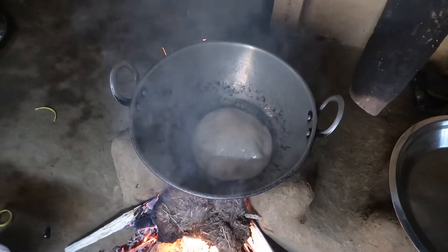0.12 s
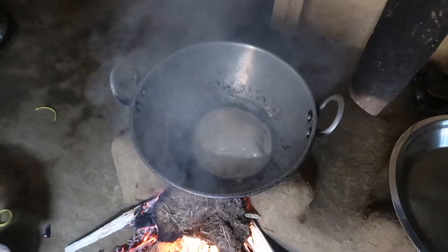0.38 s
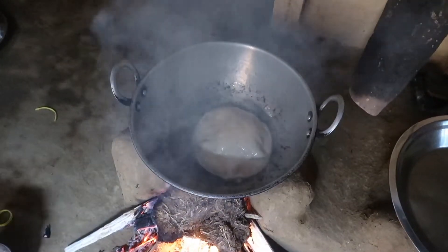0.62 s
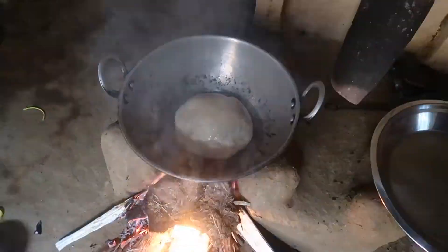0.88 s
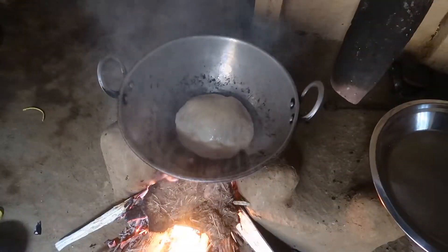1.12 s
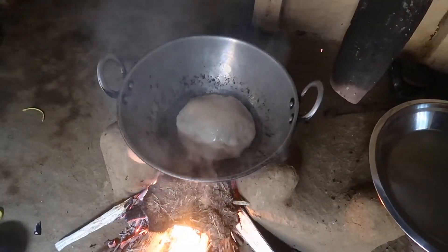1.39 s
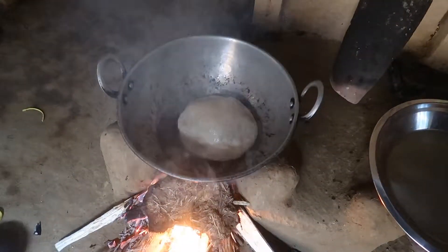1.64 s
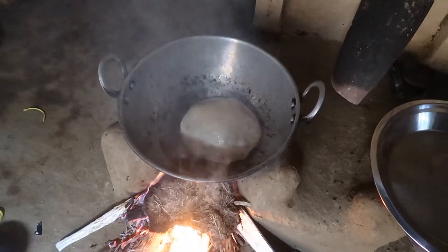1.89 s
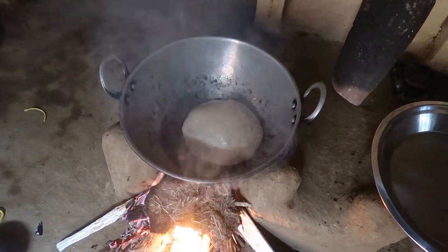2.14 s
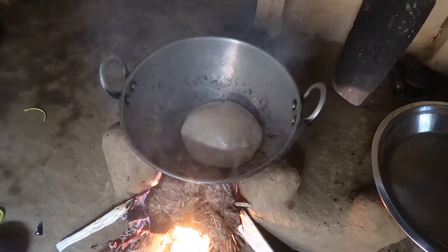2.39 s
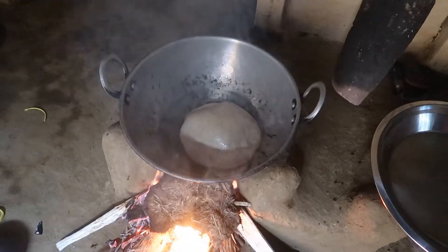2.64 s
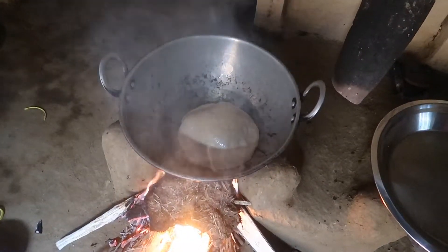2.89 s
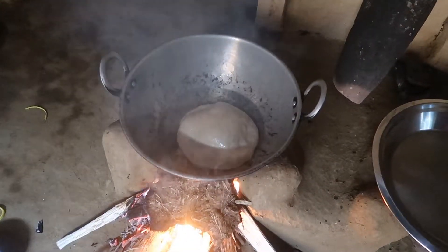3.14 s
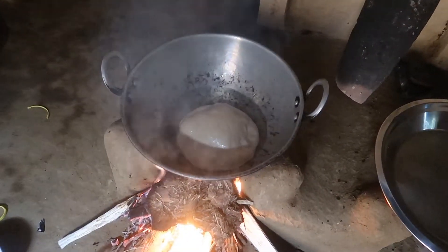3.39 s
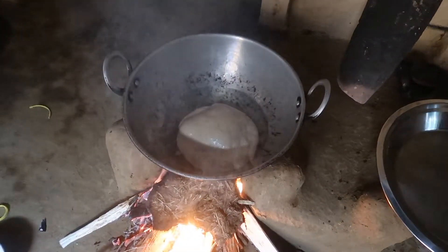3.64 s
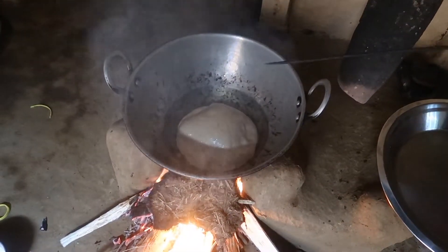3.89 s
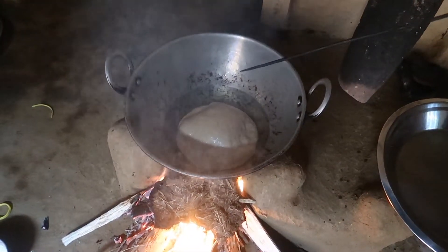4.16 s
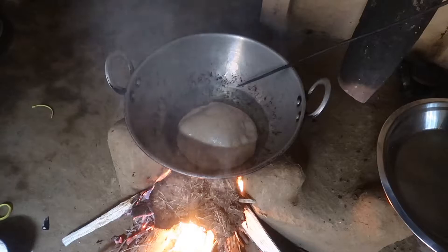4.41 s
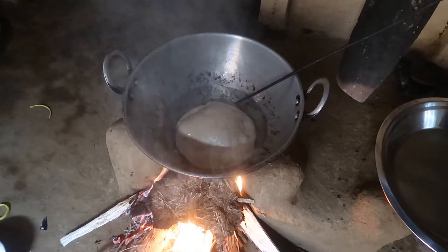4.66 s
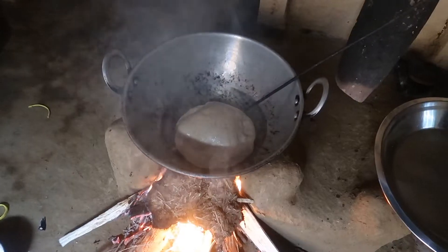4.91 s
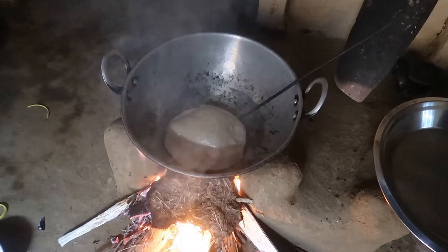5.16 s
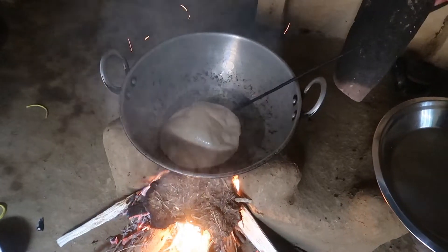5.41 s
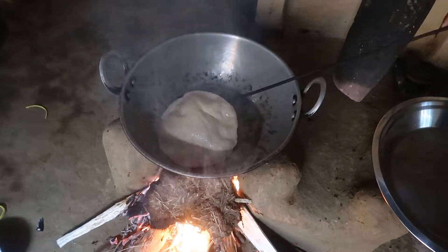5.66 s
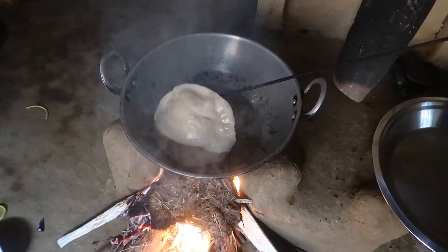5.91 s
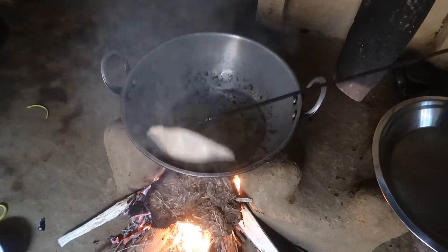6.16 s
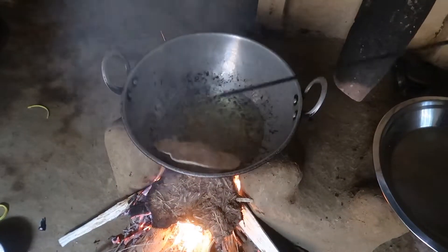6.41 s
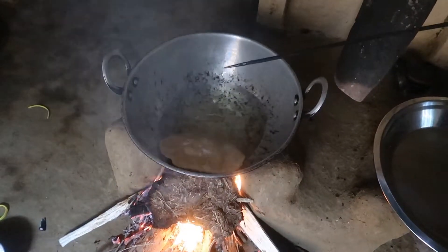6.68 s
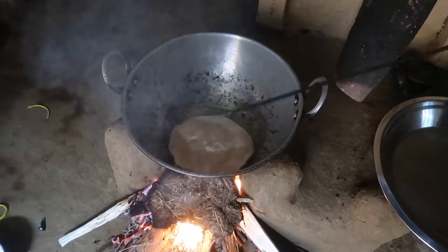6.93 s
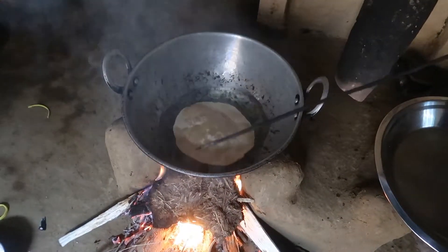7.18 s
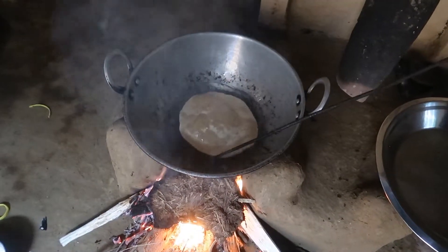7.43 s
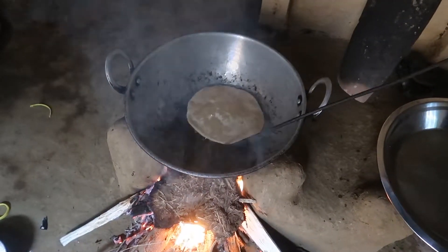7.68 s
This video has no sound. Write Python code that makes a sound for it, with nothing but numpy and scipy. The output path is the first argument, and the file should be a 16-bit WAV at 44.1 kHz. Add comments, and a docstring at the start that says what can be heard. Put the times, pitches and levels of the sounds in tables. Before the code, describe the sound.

Gentle oil hiss and fire pops in a small kitchen, a metal tool clanks and scrapes, a burning stick cracks loudly, bubbling builds.

```python
"""Dough fries in a wok of oil over a wood fire in a small, half-open kitchen; the fire rumbles low throughout.
At first noise hiss and ringing bubbles weaken while filtered noise bursts pop; dull modal knocks come
from nearby. After 4 s a metal tool of dying sines clanks, bounces and drags. A stick then splits with
the loudest crack, gain control ducks the level, and the frying returns, livelier, with more pops and
knocks. The walls add a short noise tail."""
import sys
import numpy as np
from scipy import signal
from scipy.fft import rfft, irfft
from scipy.io import wavfile
from scipy.ndimage import uniform_filter1d

SR = 44100
rng = np.random.default_rng(int(sys.argv[2]) if len(sys.argv) > 2 else 0)


def int16_out(signal):
    """Quantize to a 16-bit WAV file."""
    q = np.round(np.clip(np.atleast_2d(signal).T, -1, 1) * 32767)
    wavfile.write(sys.argv[1], SR, q.astype(np.int16))


def invert_db(x):
    """Field ratio 10**(x/20) for x, a level in decibels (scalar or array-like)."""
    u = np.asarray(x, float) / 20
    return 10 ** u


N = 343980


def evened(x):
    """Scales to rms 1."""
    return x / np.sqrt(np.mean(x ** 2) + 1e-20)


def read(points, hz):
    """Interpolates a spectrum on a log-frequency axis."""
    f, value = np.transpose(points)
    return np.interp(np.log(hz + 1), np.log(f + 1), value)


def curve(rows, column):
    """Interpolates one dB column over time, as gain per sample."""
    rows = np.array(rows)
    return invert_db(np.interp(np.arange(N) / SR, rows[:, 0], rows[:, column]))


def band(x, low_hz, high_hz):
    """Butterworth band-pass."""
    edges_hz = [low_hz, min(high_hz, SR / 2.2)]
    return signal.sosfilt(signal.butter(2, edges_hz, "band", fs=SR, output="sos"), x)


def resonate(x, hz, width_hz):
    """A fixed resonance of peak gain 1."""
    b, a = signal.iirpeak(hz, hz / width_hz, SR)
    return signal.lfilter(b, a, x)


def ring(modes, hard_hz):
    """Dying sines; a soft contact weakens the high ones."""
    t = np.arange(SR // 3) / SR
    hz, db, t60_s = np.transpose(modes)[:, :, None]
    level = invert_db(db - 60 * t / t60_s) / (1 + (hz / hard_hz) ** 2)
    return (level * np.sin(2 * np.pi * hz * t)).sum(0)


def burst(ms):
    """A sharp step and a puff of noise with time constant ms, whitened, then faded at half that rate."""
    fading = np.exp(-np.arange(SR // 10) / (ms * SR / 1000))
    puff = 0.3 * rng.standard_normal(SR // 10) * fading
    puff[0] = 1
    z = rfft(puff)
    return irfft(z / abs(z)) * np.sqrt(fading)


# left-right likeness of broad noise: f/Hz, correlation
LIKENESS = [(60, 0.99), (180, 0.33), (550, -0.019), (1650, 0.68), (4970, 0.71), (15000, -0.26)]


def air(spectrum, patchy_db, size):
    """Stereo noise of rms 1 from random short-time spectra with drifting patches; size in samples."""
    hz = np.fft.rfftfreq(size, 1 / SR)
    a, b, c, d, patches = rng.standard_normal((4 * N // size + 5, len(hz), 5)).T
    patches = uniform_filter1d(patches, size=4, axis=0)
    patches = evened(uniform_filter1d(patches, size=10, axis=1))
    same = np.clip(read(LIKENESS, hz), -1, 1)[:, None]
    left = a + 1j * b
    right = same * left + np.sqrt(1 - same ** 2) * (c + 1j * d)
    z = np.array([left, right]) * invert_db(read(spectrum, hz)[:, None] + patchy_db * patches)
    noise = signal.istft(z, nperseg=size, noverlap=3 * size // 4)[1]
    return evened(noise[:, :N])


# decay of the kitchen's tail: f/Hz, t60/s
WALL_DECAY = [(200, 0.35), (530, 0.13), (1390, 0.19), (3680, 0.19), (9700, 0.06)]


def walls(x, wet_db, apart, boom_db):
    """Direct sound, a fresh noise tail for each call, and the kitchen's lowest standing wave."""
    boom_hz, boom_t60_s = 154, 0.3
    length = SR // 3
    hz, t, (both, either) = signal.stft(rng.standard_normal((2, length)), SR, nperseg=128)
    either *= apart * (0.073 + hz[:, None] / 6000)  # sides differ most in the treble
    fading = invert_db(-60 * t / read(WALL_DECAY, hz)[:, None])
    z = np.array([both + either, both - either]) * fading
    tail = signal.istft(z, SR, nperseg=128)[1][:, :length]
    tail *= 1 - np.exp(-np.arange(length) / (0.0011 * SR))  # first echoes take a few ms
    tail *= invert_db(wet_db) / np.linalg.norm(tail.mean(0))
    tail += ring([(boom_hz, boom_db, boom_t60_s)], SR)
    tail[:, 0] = 1  # direct sound
    return signal.fftconvolve(x[None], tail, axes=1)


def add(mix, s, db, sound):
    """Lays a sound into the mix at time s, scaled to its peak level."""
    part = mix[:, round(s * SR):][:, :sound.shape[1]]
    part += invert_db(db) * sound[:, :part.shape[1]] / abs(sound).max()


# frying vigour: t/s, bubbling level/dB, steam level/dB
FRYING_LEVELS = [(0.0, -51.5, -50.5), (0.76, -52.5, -50.5), (0.86, -53.5, -54.5), (1.5, -56.5, -56),
                 (2.6, -55.5, -55.5), (3.3, -58.5, -54.5), (4.3, -70, -54.5), (5.08, -54.5, -57.5),
                 (5.2, -57, -62), (5.6, -58.5, -64), (6.2, -56.5, -58.5), (6.45, -49.5, -55),
                 (6.7, -48.5, -57.5), (7.1, -46, -58), (7.45, -45.5, -51), (7.8, -44.5, -57.5)]
# coarse sizzle spectrum: f/Hz, relative level/dB
SIZZLE_SPECTRUM = [(500, -36), (900, -6), (1300, -4), (1800, -4), (2190, -3.5), (2260, 1.5), (2340, -3),
                   (3000, -2.5), (3800, -5.5), (5000, -10), (7000, -14.5), (11000, -27)]
# escaping steam spectrum: f/Hz, relative level/dB
STEAM_SPECTRUM = [(1500, -28), (4000, -7), (6000, -6.5), (8000, -9), (11000, -9), (13000, -17),
                  (14800, -14), (15400, -27), (16000, -63)]


def hiss():
    """Coarse sizzle roughened by tiny spits of uneven size, under a fine smooth steam hiss."""
    simmer_db, sizzle_over_bubbling_db = -53.5, 1.5  # the hot oil never falls silent
    spits_per_s, spit_decay_s = 150, 0.004
    spits = invert_db(1.6 * np.minimum(rng.exponential(1, N), 4)) * (rng.random(N) < spits_per_s / SR)
    spits = signal.lfilter([1], [1, -np.exp(-1 / (spit_decay_s * SR))], spits)
    sizzle = evened(air(SIZZLE_SPECTRUM, patchy_db=2.0, size=512) * (1 + 0.15 * spits))
    vigour = invert_db(sizzle_over_bubbling_db) * curve(FRYING_LEVELS, column=1)
    sizzle_level = np.hypot(invert_db(simmer_db), vigour)
    steam = curve(FRYING_LEVELS, column=2) * air(STEAM_SPECTRUM, patchy_db=2.5, size=512)
    return sizzle_level * sizzle + steam


# resonances of wok and oil: f/Hz, width per filter pass/Hz, relative level/dB
POOL_RESONANCES = [(340, 120, -6), (430, 80, -6), (635, 100, 0), (780, 120, -9), (960, 120, -9),
                   (650, 800, 0)]


def bubbling():
    """Bubbles burst at random and ring the pool of oil, each in one of its resonances."""
    pool = np.zeros(N)
    spread_db, bursts_per_s = 4.2, 50  # for each resonance
    for hz, width_hz, db in POOL_RESONANCES:
        size = invert_db(spread_db * np.minimum(rng.exponential(1, N), 3))
        bursts = size * (rng.random(N) < bursts_per_s / SR)
        rung = resonate(resonate(bursts, hz, width_hz), hz, width_hz)
        pool += invert_db(db) * evened(rung)
    echoed = walls(pool, wet_db=-6.0, apart=0.3, boom_db=-64)[:, :N]
    return curve(FRYING_LEVELS, column=1) * evened(echoed)


# wood and oil pops: t/s, peak level/dB, low edge f/Hz, high edge f/Hz, raw puff time constant/ms
POP_EVENTS = [(.115, -35.5, 494, 800, 2.2), (0.564, -35, 450, 1100, 3.6), (1.022, -28, 1240, 5040, 6.7),
              (1.1205, -42, 500, 1500, .6), (2.289, -37, 2000, 5000, 5.2), (2.3745, -21, 970, 2350, 0.68),
              (2.761, -26.5, 600, 9000, 1.2), (3.11, -35, 2440, 7900, 4.2), (3.229, -38, 9000, 13800, 2.2),
              (3.403, -30, 2060, 9700, 45), (3.976, -29, 775, 2490, 2), (4.005, -12.5, 990, 4130, 0.34),
              (4.998, -32.5, 590, 5000, 4.3), (5.499, -33.5, 497, 970, 18), (6.036, -33, 3600, 9050, 4),
              (6.045, -33.5, 3000, 3460, 1.5), (6.0455, -28.5, 1860, 2360, 0.56),
              (6.241, -26.5, 350, 1190, 0.85), (6.555, -18.5, 1600, 3160, 0.67),
              (6.963, -29, 890, 4030, 0.69), (7.276, -32, 550, 1000, 2.3), (7.49, -31, 495, 870, 0.55)]


def pops():
    """Gas pockets burst: a short puff with its own colour over a wide crack."""
    mix = np.zeros((2, N))
    for s, db, low_hz, high_hz, ms in POP_EVENTS:
        crack_db = -9 - 0.5 * np.log2(ms)  # longer bursts crack less
        puff = burst(ms)
        coloured = band(band(puff, low_hz, high_hz), 0.5 * low_hz, 1.07 * high_hz)
        crack = band(band(puff, 200, 4700), 100, 8500)
        pop = evened(coloured) + invert_db(crack_db) * evened(crack)
        add(mix, s, db, walls(pop, wet_db=2.0, apart=0.89, boom_db=-50))
    return mix


# modes of the burning stick: f/Hz, relative level/dB, t60/s
STICK_MODES = [(190, -13, 0.065), (350, -20, 0.23), (450, -0.5, 0.039), (1100, 2.5, 0.026),
               (1500, 2, 0.018), (2020, -3, 0.027), (2750, -6.5, 0.032), (1305, -2, 0.017)]


def bang():
    """A burning stick splits in one hard click: it rings a few cycles and a rough crash fills the kitchen."""
    start_s, peak_db = 5.1168, 9
    mix, click = np.zeros((2, N)), burst(1.0)
    crash = band(click, 204, 2150)
    crash += invert_db(-15) * band(click, 1150, 4500)
    crash += invert_db(-46) * band(click, 200, 9000)
    split = evened(walls(crash, wet_db=4.5, apart=0.82, boom_db=-64))
    split[:, :SR // 3] += invert_db(6.0) * evened(ring(STICK_MODES, SR))
    add(mix, start_s, peak_db, split)
    return mix


# metal tool, a blow and its bounces: t/s, peak level/dB, hardness f/Hz
CLANK_EVENTS = [(4.4076, -4, 4740), (4.504, -18, 3400), (4.537, -23.5, 3160), (4.574, -19.5, 3970)]
# tool modes: f/Hz, relative level/dB, t60 when struck/s
TOOL_MODES = [(336, -1.5, 0.065), (450, 1, 0.14), (494, -3.5, 0.11), (1165, -5, 0.28), (1395, -7, 0.053),
              (1660, 4, 0.15), (1720, -15, .06), (2000, -1, 0.027), (2125, 7.5, 0.03), (2710, 1, 0.048),
              (3730, 1, 0.064), (3000, -10, .06), (3330, -2, .06), (4200, 3, .07), (5500, 8, 0.031),
              (4666, 15.5, 0.017), (5000, 2, .05), (6010, 4, 0.12)]
# the tool slides: t/s, length/s, grit level before output gains/dB
DRAG_STROKES = [(4.499, 0.14, -49.5), (4.736, 0.27, -52.5)]


def drag_pressure(t, s, hold_s):
    """Pressure starts at about half, builds through the stroke's first part, then lets go."""
    rise = (t > s) * (0.49 + (t - s) / (0.8 * hold_s))
    release_s = 0.06
    release = 1 + (s + hold_s - t) / release_s
    return np.clip(np.minimum(rise, release), 0, 1)


def tool():
    """Blows and a dragged, gritty contact ring the same metal; blows clatter, the drag rubs."""
    mix = np.zeros((2, N))
    for s, db, hard_hz in CLANK_EVENTS:
        puff = burst(3.1)
        clatter = band(band(puff, 204, 0.79 * hard_hz), 200, 5700)
        clatter = evened(walls(clatter, wet_db=10.0, apart=0.69, boom_db=-39))
        clang = band(signal.fftconvolve(puff, ring(TOOL_MODES, hard_hz)), 206, 4700)
        add(mix, s, db, clatter + invert_db(1.0) * evened(clang))
    t = np.arange(N) / SR
    grains_per_s, damping_s = 1500, 0.06
    grit = rng.standard_normal(N) * (rng.random(N) < grains_per_s / SR)
    grit *= sum(invert_db(db) * drag_pressure(t, s, hold_s) for s, hold_s, db in DRAG_STROKES)
    rub = band(grit, 414, 770) + invert_db(-20) * band(grit, 3600, 5100)
    rub = walls(rub, wet_db=5.0, apart=0.64, boom_db=-50)[:, :N]
    damped_ring = ring(TOOL_MODES, 1060) * np.exp(-t[:SR // 3] / damping_s)
    scrape = signal.oaconvolve(grit, damped_ring)[:N]
    return mix + invert_db(-3) * scrape + invert_db(29) * rub


# dull knocks: t/s, peak level/dB, low edge f/Hz, high edge f/Hz
KNOCK_EVENTS = [(2.630, -22.5, 124, 363), (2.812, -24, 209, 520), (2.943, -23.5, 162, 1100),
                (4.187, -24, 119, 248), (5.698, -32.5, 129, 715), (5.805, -32.5, 450, 760),
                (6.14, -38, 406, 875), (6.764, -12, 133, 510)]
# modes of the hollow body: f/Hz, relative level/dB, t60/s
BODY_MODES = [(157.9, 1.5, 0.27), (209, -0.5, 0.088), (294, -3, 0.2), (346, -7.5, 0.21), (461, -20, 0.36),
              (648, -5, 0.09), (970, -2.5, 0.091), (1134, -2, 0.035)]


def knocks():
    """A hollow body is struck softly: its modes, a rough thud that echoes, and grit at the contact."""
    mix = np.zeros((2, N))
    for s, db, low_hz, high_hz in KNOCK_EVENTS:
        ms = 1000 * 1.83 / high_hz  # 1.83 cycles of the high edge
        grit_db = 3 + 0.74 * db  # weaker knocks are smoother
        force = 1.1 - np.exp(-np.arange(SR // 10) / (ms * SR / 2000))  # builds up
        puff = burst(ms) * force
        thud = evened(band(band(puff, low_hz, high_hz), 1.05 * low_hz, 3 * high_hz))
        grit = band(puff, 400, 1180) + 0.24 * band(puff, 1320, 2260)
        thud += invert_db(grit_db) * evened(grit)
        blow = evened(walls(thud, wet_db=2.0, apart=0.56, boom_db=-46.5))
        push = np.hanning(round(0.47 * ms * SR / 1000) + 2)  # the body feels one smooth push
        push = np.pad(push, (0, SR // 10 - len(push)))
        modes = band(signal.fftconvolve(push, ring(BODY_MODES, SR)), low_hz, high_hz)
        add(mix, s, db, blow + invert_db(2.0) * evened(modes))
    return mix


# flame spectrum: f/Hz, relative level/dB
FLAME_SPECTRUM = [(12, -24), (20, -7), (38, -4.5), (86, -4), (176, -3), (206, -6.5), (381, -8), (415, -7),
                  (492, -11), (605, -9.5), (706, -17.5), (1200, -23), (1560, -47), (2640, -120)]


def flame():
    """The wood fire's low, lumpy rumble: noise with slow patches."""
    return invert_db(-46.5) * air(FLAME_SPECTRUM, patchy_db=1.5, size=4096)


def scene():
    """Sums all sources, the left side slightly louder."""
    balance = invert_db([[0.3], [-0.3]])
    return balance * (hiss() + bubbling() + pops() + bang() + tool() + knocks() + flame())


def low_pass(x):
    """Removes everything above the highest recorded frequency."""
    return signal.sosfilt(signal.butter(12, 16370, fs=SR, output="sos"), x)


def record(dry):
    """Gain control falls after a very loud sound and recovers slowly; peaks clip softly."""
    threshold_db, detector_fall_db_per_s = -12.5, 11.4
    lag_s, share, ceiling = 0.11, 0.75, 0.97  # share of the excess dB taken away
    power = abs(uniform_filter1d((dry ** 2).mean(0), size=400))
    power_db = 10 * np.log10(power + 1e-12)
    fall_db = np.arange(N) * detector_fall_db_per_s / SR
    held_db = np.maximum.accumulate(power_db + fall_db) - fall_db
    over_db = np.maximum(held_db - threshold_db, 0)
    lag = np.exp(-1 / (lag_s * SR))
    ducked = dry / invert_db(share * signal.lfilter([1 - lag], [1, -lag], over_db))
    return low_pass(ceiling * np.tanh(ducked / ceiling))


dry = scene()
out = record(dry)
int16_out(out)
```